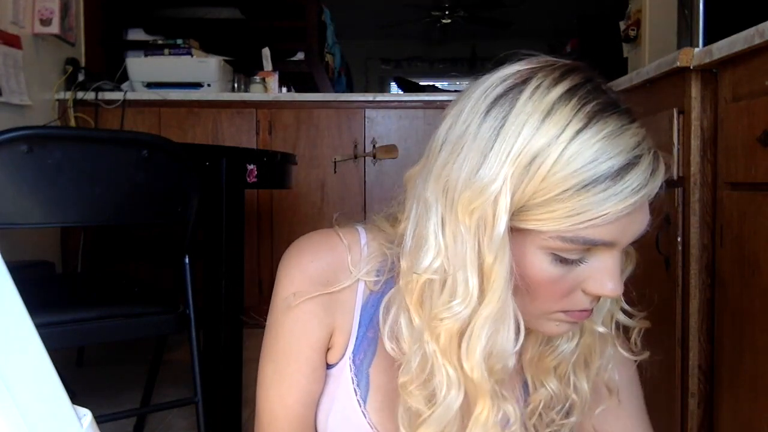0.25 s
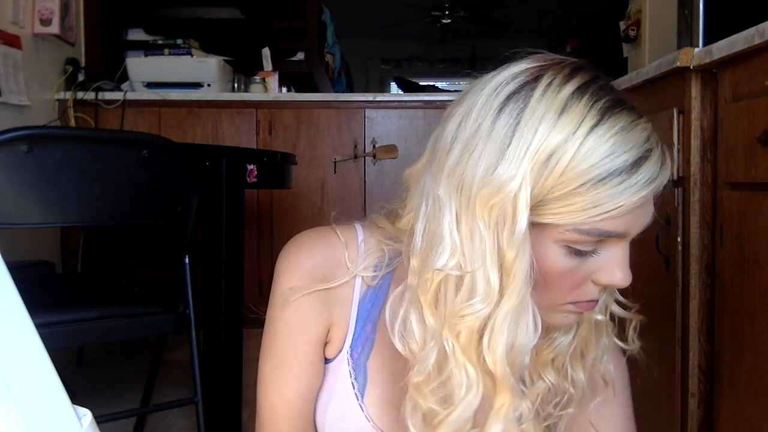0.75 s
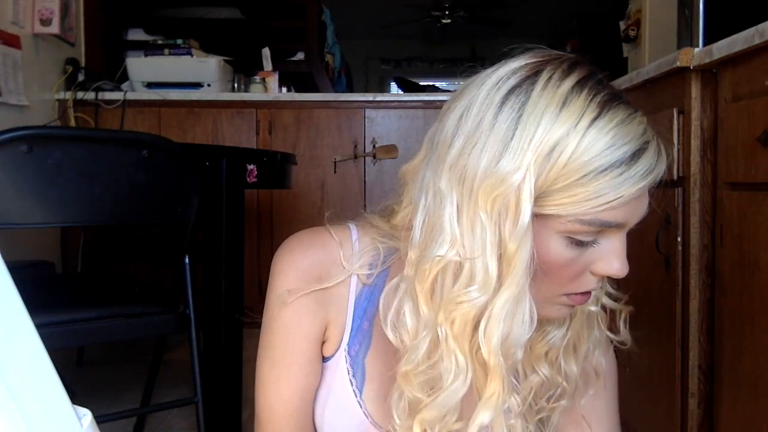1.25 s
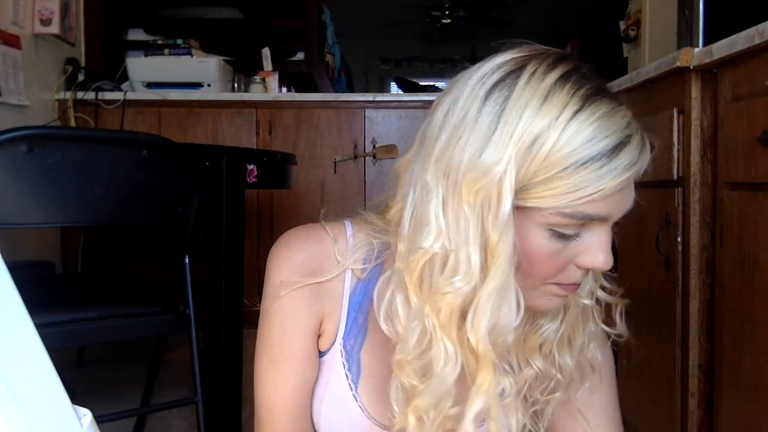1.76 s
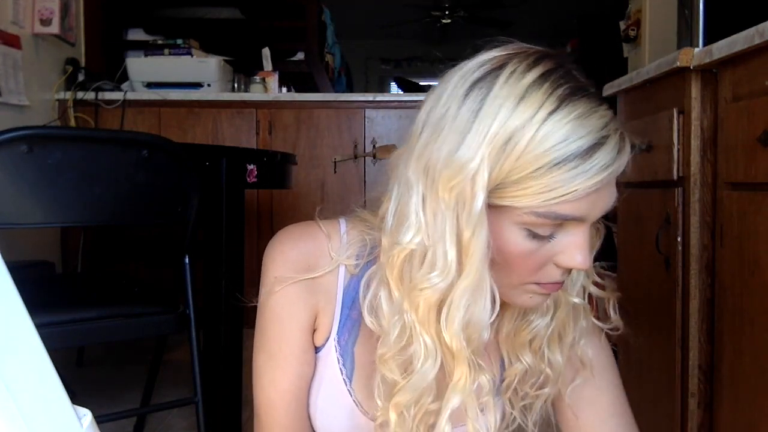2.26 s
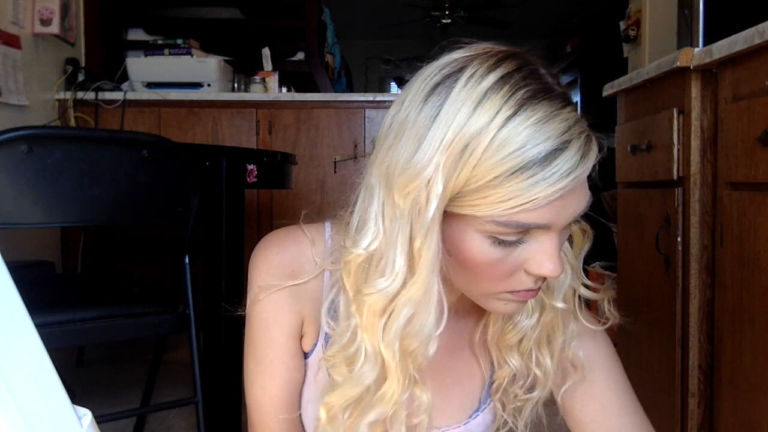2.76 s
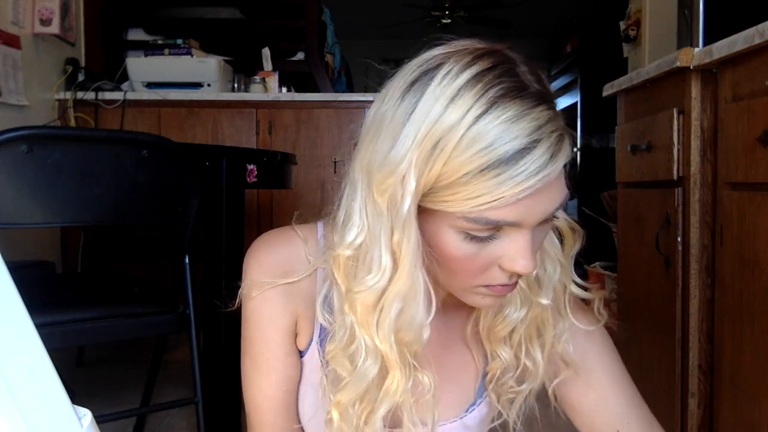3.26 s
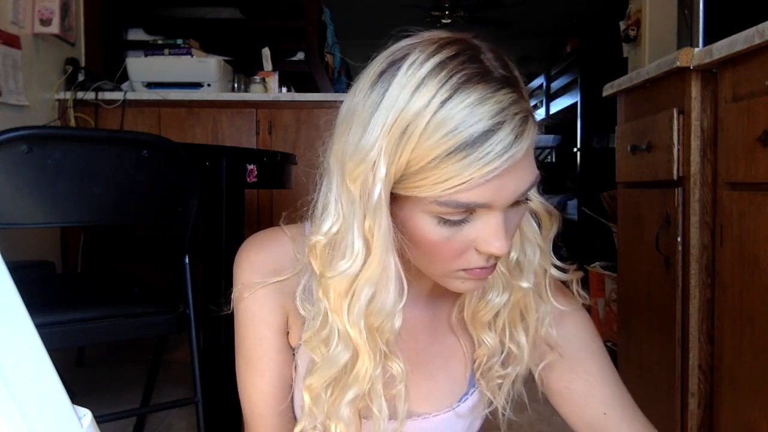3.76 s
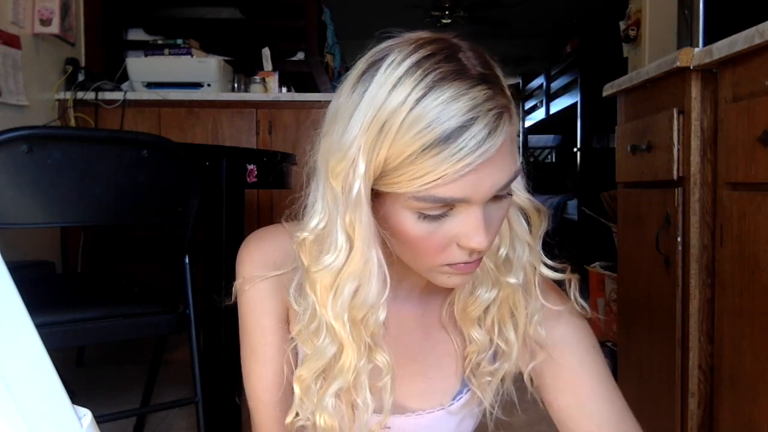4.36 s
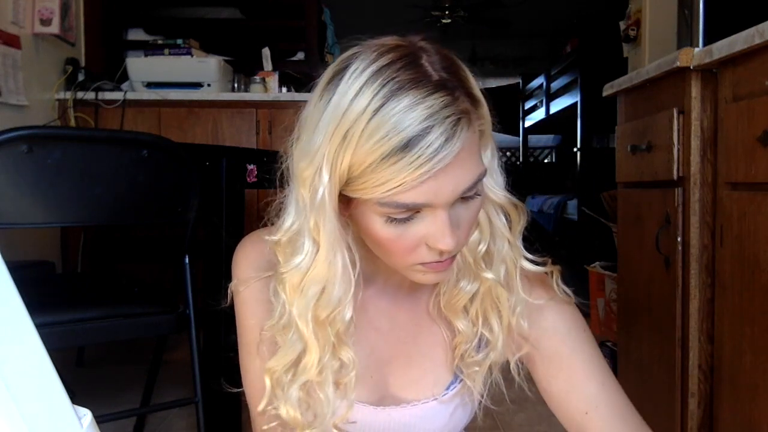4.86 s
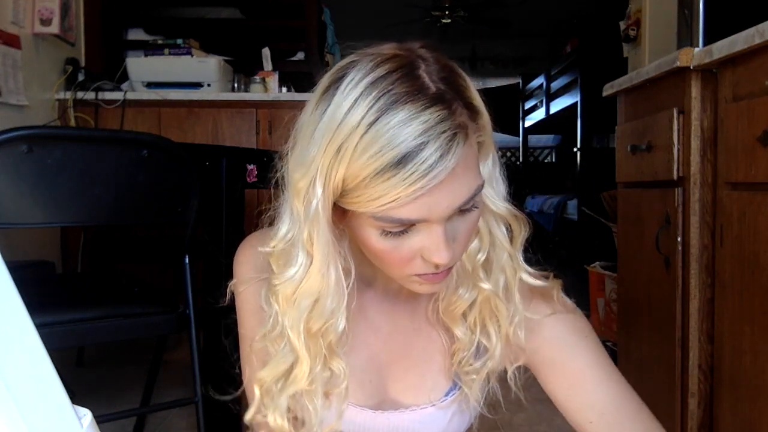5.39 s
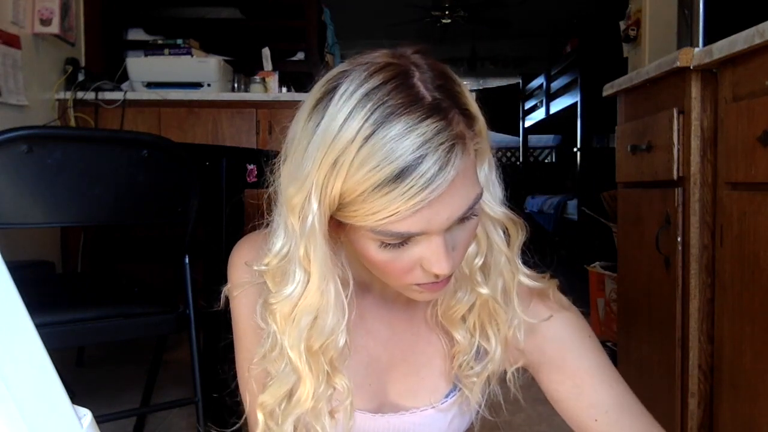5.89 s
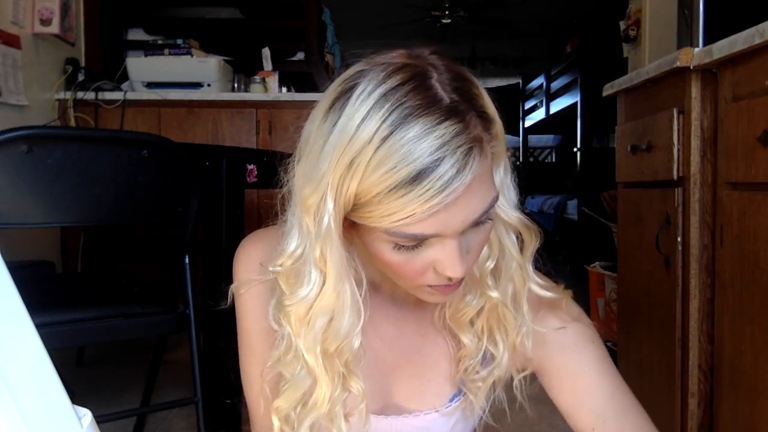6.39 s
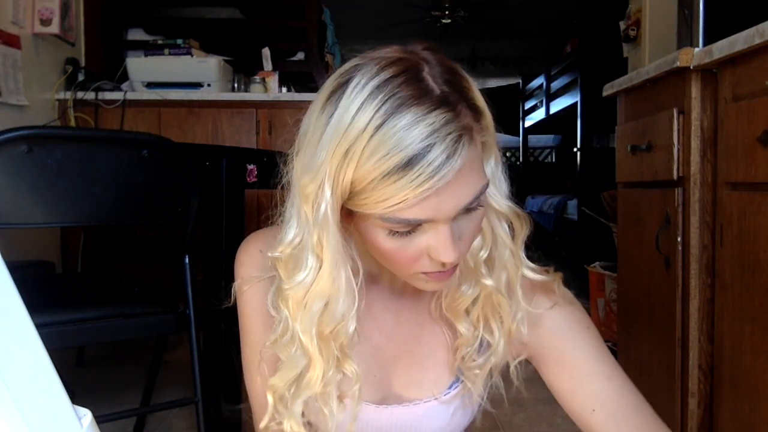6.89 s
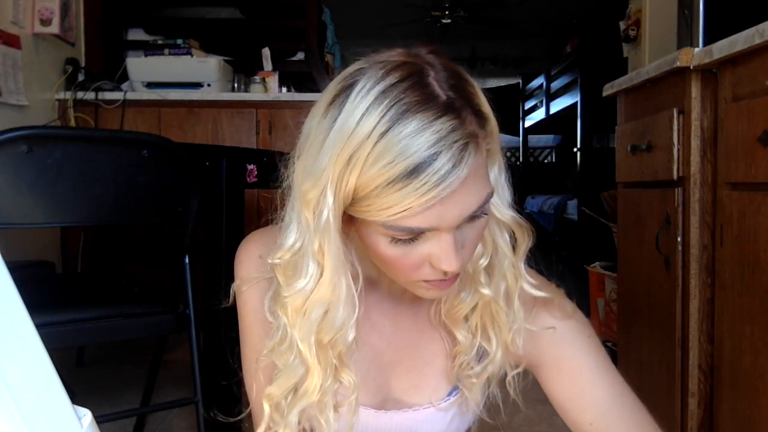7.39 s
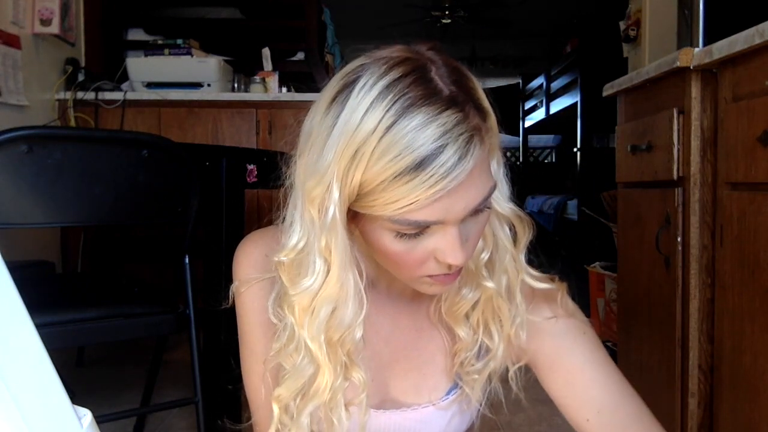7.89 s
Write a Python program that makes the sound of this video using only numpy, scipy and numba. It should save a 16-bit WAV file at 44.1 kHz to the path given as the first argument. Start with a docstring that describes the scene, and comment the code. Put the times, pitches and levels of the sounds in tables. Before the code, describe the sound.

Irregular rummaging among small cosmetics: dry knocks, bright cracks, short glassy rings, loose ticking and scraping, and occasional heavier items landing on a wooden-sounding drawer floor. It clatters thickly at first, calms after three seconds, resumes strongly, lulls again near seven, and finishes busy. The sound is near and slightly dull, with short small-room echoes over a low hiss and faint hum.

```python
"""Close by a laptop microphone in a small quiet room, a hand rummages for 8 s through makeup items in a drawer.
Clacks of plastic and glass come at once: uneven contacts that knock, crack and ring the item and the drawer.
From 0.4 s the drawer thuds now and then, heavy items land, loose ones tick and scrape, thin rings of glass
and metal sing near 0.5, 5.5, 6.5 and 7.9 s. It is calmer after 3.3 s and 6.8 s, and ends on a dense run
of clacks from 7.5 s. Hiss and hum lie beneath throughout, and a noise suppressor holds quiet moments down."""
import sys
import numpy as np
from scipy import signal
from scipy.fft import rfft, irfft
from scipy.io import wavfile
from scipy.ndimage import uniform_filter1d
from numba import njit

SR = 44100
rng = np.random.default_rng(int(sys.argv[2]) if len(sys.argv) > 2 else 0)


def to_wav(s):
    """Save 16-bit WAV."""
    ch = np.atleast_2d(s).T  # columns
    pcm = np.round(np.clip(ch, -1, 1) * 32767)  # PCM
    wavfile.write(sys.argv[1], SR, pcm.astype(np.int16))


N = 358974  # samples, 8.14 s

# room hiss, shape of its spectrum: pitch_hz, density_db (relative, per Hz)
HISS_SPECTRUM = [(30, -29), (60, -15.5), (110, -9.5), (200, -9), (420, -10), (700, -7.5), (900, -5),
                 (1250, -3.5), (1600, -11), (2500, -11.5), (4000, -18.5), (7500, -24.5), (10500, -40.5),
                 (16000, -80)]
# echo of the small room in bands: pitch_hz, t60_s, level_db (relative)
ECHO_BANDS = [(442, 0.18, 10.5), (1250, 0.24, 7.5), (4080, 0.24, 3), (6900, 0.18, 4.5), (12000, 0.11, -16)]
# thuds of the drawer on its runners: start_s, level_db (peak of the tone),
# pitch_hz (nominal; the tone starts above it and sags just below)
THUDS = [(0.388, -26, 166), (1.029, -32, 158), (1.463, -35, 117), (2.468, -37, 154), (3.023, -26.5, 114),
         (4.15, -30.5, 112), (4.612, -32, 151), (4.777, -32, 122), (5.09, -34, 112), (5.157, -25, 103),
         (5.618, -35, 159), (7.345, -33, 94), (8.03, -35.5, 162)]
# resonances of the drawer: pitch_hz, level_db (relative), t60_s
DRAWER_MODES = [(177, 1.5, 0.033), (327, -11, 0.0327), (500, -10, 0.026), (562, -12, 0.038),
                (665, 12, 0.08), (792.6, 19.5, 0.034), (951, 1.5, 0.045), (1148, 10, 0.081),
                (1370, 7.5, 0.018)]
# stirring of the loose items, one list of points for each handful: time_s, gain_db
STIR_HANDFULS = [
    [(0.42, -61), (0.622, -46), (0.846, -30), (1.178, -34), (1.38, -46)],
    [(2.27, -50), (2.312, -47), (2.432, -45), (2.886, -36.5), (2.92, -28)],
    [(3.17, -26), (3.224, -28), (3.38, -25)],
    [(4.58, -25), (4.79, -32.5), (5.318, -28.5), (5.49, -30), (5.68, -52)],
    [(6.06, -52), (6.264, -41), (6.486, -36), (6.616, -29), (6.78, -55)],
    [(7.5, -44), (7.92, -42), (8.034, -24), (8.14, -43)],
]
# thin rings of small glass and metal parts: start_s, level_db (peak), pitch_hz, rub_s
TINKS = [(.49, -33, 4880, 0.098), (0.501, -30, 6930, 0.087), (0.509, -33, 8800, 0.058),
         (5.494, -32, 14400, .03), (5.534, -42, 14500, 0.035), (6.536, -31, 14300, 0.04),
         (7.897, -38, 14200, 0.025)]
# heavy items landing on the drawer floor: start_s, level_db (peak), pitch_hz (of the panel)
LANDINGS = [(0.394, -14.5, 247), (1.072, -26, 440), (1.195, -12.5, 350), (4.598, -22, 463),
            (5.021, -18.5, 460), (5.606, -19, 457), (6.71, -13, 470)]
# resonances of an item: pitch_ratio, level_db (relative), ring_cycles (to fade 60 dB; below 0: shortest ring)
ITEM_MODES = [(1, 3, 31.5), (.62, -8.5, 13), (1.47, -4, 31.5), (2.1, -10.5, 22.5), (2.9, -11, -22.5)]
# clacks: start_s, level_db (nominal), pitch_hz (of the item), crack_db and drawer_db (both re level_db)
CLACKS = [(0.015, -18, 1050, -13, -31), (0.045, -20, 1300, -27, -22), (0.101, -22, 2400, -17, -29),
          (0.108, -7, 1710, -20, -17.5), (0.258, -20.5, 1930, -17, -16), (0.394, -7.5, 1810, -4, -11),
          (0.443, -10, 1240, -8, -31), (0.471, -16, 5560, -7, -36), (0.551, -14.5, 3870, -16, -46),
          (0.563, -9, 1810, 3, -28), (0.57, -2.5, 1320, -2.5, -20), (0.619, -1.5, 1677, -17, -17.5),
          (0.697, -11.5, 1470, -9, -39), (0.757, -17.5, 4610, -8, -17), (0.766, -6.5, 3130, -5.5, -42),
          (0.808, -7, 1040, 6.5, -25), (0.932, -22.5, 2540, -3, -22), (0.944, -16.5, 4160, -6, -33),
          (0.957, -6.5, 1430, -16.5, -27), (1.006, -12, 1210, -2, -22), (1.02, -5.5, 1240, -6.5, -38),
          (1.04, -8.5, 1060, -3.5, -24), (1.057, -4, 1690, -21, -10), (1.076, -7.5, 1040, -10, -28),
          (1.119, -8, 1840, -10, -38), (1.144, -11, 4140, -4.5, -39), (1.17, -26, 4230, -2, -15),
          (1.195, -1.5, 1780, -3, -9), (1.234, -11.5, 4300, -8, -24), (1.24, -4.5, 2500, -22, -11.5),
          (1.3, -20.5, 2510, -6, -7), (1.32, -10.5, 1450, -1, -32), (1.41, -6, 1660, -14.5, -42),
          (1.559, -7, 1554, -6.5, -36), (1.625, -13.5, 1740, 3.5, -7), (1.788, -6.5, 3720, -32, -16),
          (1.823, -11, 2630, -16, -37), (1.84, -11, 2960, -20, -34), (1.877, -12.5, 2850, -15, -11.5),
          (1.897, -9, 1980, -4.5, -27), (2.257, -16, 1710, -6, -4), (2.273, -5.5, 2780, -9, -11.5),
          (2.316, -7, 1220, -15, -12.5), (2.329, -15, 1650, -7, -29), (2.355, -15, 1630, -5, -25),
          (2.402, -17.5, 1870, -5.5, -12), (2.432, -17, 1260, -13, -26), (2.441, -10, 1270, -14, -29),
          (2.478, -2, 1236, -13.5, -23), (2.49, -2, 1450, 0, -11.5), (2.519, -8, 3820, -16, -15),
          (2.656, -7.5, 1740, -23, -28), (2.672, -3, 1333, -7.5, -33), (2.772, -11.5, 3070, -29, -32),
          (2.781, -7.5, 1840, -38, -13.5), (2.832, 3, 6830, -19, -19), (2.854, -3.5, 1200, -12, -43),
          (2.949, -12.5, 3770, -34, -20), (2.977, -15.5, 1690, -11, -22), (3, -14.5, 1180, -18, -26),
          (3.066, -22, 1900, -3, -16), (3.098, -15, 2620, -24, -13), (3.116, -12.5, 1600, -19, -34),
          (3.18, -10, 1170, -16, -35), (3.193, -11.5, 1110, -7, -18), (3.201, 0, 1150, -10.5, -39),
          (3.226, 0.5, 3250, -18, -12), (3.269, -6.5, 2950, 1.5, -15), (3.283, 0.5, 2560, -9, -16.5),
          (3.348, -8, 5830, -29, -31), (3.619, -22, 3170, -21, -30), (3.73, -18, 3430, -20, -9.5),
          (3.869, -22.5, 2010, -3, -23), (3.895, -17.5, 4270, -11, -36), (3.915, -20.5, 2380, 7.5, -36),
          (3.955, -19, 6300, -11, -30), (4.139, -21, 3840, -5, -28), (4.334, -18, 902, -15.5, -14),
          (4.383, -15, 946, -19, -16), (4.43, -22.5, 6200, -15, -25), (4.444, -18, 6110, -16, -24),
          (4.48, -10, 4360, -29, -22.5), (4.587, -13.5, 6600, -19, -31), (4.599, 4, 3020, -32, -15.5),
          (4.629, -2, 1280, -3.5, -11.5), (4.646, -6, 1380, 3, -11.5), (4.664, -7, 1170, 7.5, -12),
          (4.703, -3.5, 3000, -14, -14), (4.72, -5.5, 1430, -10, -22), (4.73, -3.5, 1197, -7, -17.5),
          (4.788, -14, 5220, -29, -25), (4.817, -20, 3050, -24, -30), (4.856, -17.5, 1540, 1, -29),
          (4.878, -3.5, 1210, 1.5, -10), (4.94, -11.5, 1780, -15, -20), (4.984, -5.5, 2480, -30, -34),
          (4.996, -3, 1360, -12.5, -18), (5.017, -9.5, 1360, -12, -21), (5.072, -8.5, 1810, -1.5, -33),
          (5.105, -8.5, 1730, -3.5, -43), (5.148, -10.5, 3350, -19, -10.5), (5.16, -10.5, 2840, -3.5, -26),
          (5.171, -7.5, 1730, -18, -7.5), (5.198, -5, 1680, -21, -19), (5.24, -9, 1180, -5, -20),
          (5.312, -7.5, 1130, -8, -28), (5.35, -11.5, 1070, -12, -25), (5.363, -17.5, 6130, -17, -17),
          (5.399, -6.5, 1370, -20, -11), (5.415, -3.5, 1610, -15, -13), (5.426, -0.5, 1130, -13, -11),
          (5.458, -1.5, 1190, -18, -13.5), (5.492, -10.5, 1350, -17, -6), (5.531, -6.5, 1270, -18, -35),
          (5.609, -5.5, 1174, -2, -20), (5.634, -6.5, 1730, -19, -12.5), (5.652, -14, 3230, -9, -12),
          (5.804, -25, 1240, 7.5, -26), (6.035, -12, 3270, -15, -15.5), (6.078, -7, 3300, -12, -26),
          (6.099, -8.5, 1050, 2.5, -37), (6.122, -7.5, 2180, -4, -9.5), (6.131, -12, 1460, -11, -28),
          (6.142, -13, 1480, 4.5, -22), (6.184, -11, 2520, -19, -11), (6.203, -8, 1680, -7.5, -12.5),
          (6.255, -9.5, 6350, -27, -38), (6.313, -17.5, 1420, -22, -17), (6.339, -20.5, 1380, 3.5, -23),
          (6.39, -15, 1400, -41, -6), (6.433, -8.5, 1390, -19, -30), (6.465, -7, 1330, 7, -43),
          (6.536, -13, 2800, -13, -41), (6.585, -10.5, 1760, -6.5, -33), (6.674, -9, 1670, 1, -11.5),
          (6.712, 3, 1240, -8, -14), (7.181, -20.5, 4120, -8.5, -29), (7.194, -17.5, 6760, -19, -18),
          (7.215, -18, 5800, -29.5, -8), (7.371, -18.5, 2140, -11.5, -22), (7.417, -28.5, 1150, 0.5, -17),
          (7.459, -21.5, 1240, -12, -8.5), (7.494, -4, 3030, -31, -46), (7.542, -15.5, 2630, -11, -31),
          (7.593, -7.5, 2820, -22, -33), (7.629, -16, 2700, -7.5, -20), (7.716, -18, 3500, -3.5, -15),
          (7.739, -17.5, 1750, -4, -26), (7.758, -9, 3440, -20, -30), (7.783, -4.5, 1220, -23, -15),
          (7.799, -4, 1120, -16, -11.5), (7.847, -17.5, 5200, -13, -22), (7.876, -22, 6740, -11, -21),
          (7.894, -12, 1190, -16, -21), (7.938, -5.5, 4100, -25, -16), (7.959, 4.5, 3270, -35, -17.5),
          (7.977, 1.5, 2680, -27, -30), (7.992, -0.5, 920, -15.5, -28), (8.019, -5.5, 2820, -15, -15),
          (8.04, -3.5, 3330, -23, -19), (8.054, -1.5, 1180, -21, -22)]

AIR_DB, HUM_DB, HUM_HZ = -39.5, -53.5, 134.5
PLACES = 4  # spots in the drawer, each with its own echo pattern
ECHO_DB, ECHO_GAP_S = -8, 0.00037
THUD_T60_S = 0.097
# a hard blow chatters longer and rings less clearly than a gentle one
BURST_MS, BURST_MS_PER_DB = 3.93, 0.0818
RING_DB, RING_DB_PER_DB = -7.5, -0.1335
LEAD_S, RISE_S = .0006, .0015  # each clack begins this early; time constant of the contact force
REBOUND_LOSS_DB, REBOUND_SCATTER_DB = -10.0, 2.5
# contacts poor in crack knock less, and stir the item's upper modes slightly more
KNOCK_DB, KNOCK_DB_PER_CRACK_DB, UPPER_DB_PER_CRACK_DB = 2, .5, -0.05
DRAWER_SCATTER_DB, DRAWER_RING_S = 4.0, 0.0041
# tiny edges that sing in the crack; cycles to fade 60 dB
CRACK_LOW_HZ, CRACK_HIGH_HZ, CRACK_CYCLES = 4540, 14600, 11
MIC_LOW_HZ, MIC_HIGH_HZ, TOP_HZ, SELF_NOISE_DB = 83.3, 13800, 15900, -69


def undb(db):
    """Decibels to amplitude."""
    return 10 ** (np.asarray(db) / 20)


def level(x, db):
    """Scales x to an RMS level."""
    return x * undb(db) / np.sqrt(np.mean(x ** 2))


def peak(x, db):
    """Scales x to a peak level."""
    return x * undb(db) / np.max(np.abs(x))


def burst(x, db, seconds):
    """Scales a short sound to an energy set by db and by a nominal duration."""
    return x * undb(db) * np.sqrt(seconds * SR / np.sum(x ** 2)) / 2


def add(out, x, s):
    """Mixes x into out from time s."""
    i = max(int(s * SR), 0)
    out[i:i + len(x)] += x[:len(out) - i]


def ring(x, hz, t60):
    """One damped mode struck by x; it radiates nothing at rest."""
    radius = np.exp(-np.log(1000) / (max(t60, .0004) * SR))
    angle = 2 * np.pi * min(hz, .4 * SR) / SR
    return signal.lfilter([1, 0, -1], [1, -2 * radius * np.cos(angle), radius * radius], x)


def band(x, lo_hz, hi_hz):
    """Keeps the band between two frequencies."""
    sos = signal.butter(2, [lo_hz, min(hi_hz, .47 * SR)], "bandpass", fs=SR, output="sos")
    return signal.sosfilt(sos, x)


def walk(rate):
    """Random levels held 1 / rate s and slewed twice; spread near 1."""
    k = int(SR / rate)
    held = np.repeat(rng.standard_normal(N // k + 1), k)
    return 1.2 * uniform_filter1d(uniform_filter1d(held, k), k)[:N]


@njit
def follow(x, rise, fall):
    """Envelope that rises fast and falls slowly."""
    y, e = np.empty(len(x)), 0.
    for i in range(len(x)):
        e += (x[i] - e) * (rise if x[i] > e else fall)
        y[i] = e
    return y


def air():
    """Smooth room hiss with a slightly restless bass, and a wavering appliance hum."""
    hz, db = np.transpose(HISS_SPECTRUM)
    f = np.maximum(np.fft.rfftfreq(N, 1 / SR), 1)
    shaped = rfft(rng.standard_normal(N)) * undb(np.interp(np.log(f), np.log(hz), db))
    bass = irfft(shaped * (f < 300), N) * undb(2.5 * walk(7))
    hiss = irfft(shaped * (f >= 300), N) * undb(.8 * walk(9))
    hum_hz = HUM_HZ * (1 + 0.0083 * walk(4.8))
    hum = np.sin(2 * np.pi * np.cumsum(hum_hz) / SR) * undb(3.5 * walk(5))
    return level(bass + hiss, AIR_DB) + level(hum, HUM_DB)


def room(dry):
    """Diffuse echoes of a small furnished room, shorter in the treble; every place has its own echo pattern."""
    t = np.arange(16384) / SR
    noise = rng.standard_normal((PLACES, len(t)))
    tail = np.zeros((PLACES, len(t)))
    for hz, t60, db in ECHO_BANDS:
        # wider bands higher up carry more energy
        part = level(band(noise, hz / 1.272, hz * 1.394), 10 * np.log10(hz / 1000))
        tail += undb(db - 60 * t / t60) * part
    tail = tail * np.clip(t / ECHO_GAP_S - 1, 0, 1)
    tail = tail * undb(ECHO_DB) / np.sqrt(np.sum(tail ** 2, axis=1, keepdims=True))
    return signal.fftconvolve(dry, tail, axes=1)[:, :N].sum(axis=0)


def thuds(push_s=0.004, sag=0.38, scrape_s=0.033, scrape_db=-3.0):
    """Soft pushes ring a low mode of the drawer, sagging in pitch, and leave an uneven rumble as it slides."""
    out, t = np.zeros(N), np.arange(8192) / SR
    swell = (1 - np.exp(-t / push_s)) ** 2
    for s, db, hz in THUDS:
        sagging_hz = hz * (1 + sag * (np.exp(-t / push_s / 4) - .3))
        tone = np.sin(2 * np.pi * np.cumsum(sagging_hz) / SR) * undb(-60 * t / THUD_T60_S)
        rumble = band(rng.standard_normal(len(t)), hz / 3.3, hz * 1.8) * np.exp(-t / scrape_s)
        add(out, peak(swell * tone, db) + peak(swell * rumble, db + scrape_db), s)
    return out


def stir(grain_db=3.5, bright_db=-10.5, low_hz=1300, high_hz=9000, cycles=12.0, flicker_db=4.0):
    """Small ticks of loose items, each kind ringing briefly on its own pitch and through the drawer's modes."""
    t = np.arange(N) / SR
    tick_db = grain_db * rng.exponential(size=N) + flicker_db * walk(60)
    ticks = (rng.random(N) < .02) * rng.standard_normal(N) * undb(tick_db)
    # the kind of item is drawn anew every 128 samples (3 ms)
    kind = np.repeat(rng.integers(0, 6, N // 128 + 1), 128)[:N]
    items = np.zeros(N)
    for k, hz in enumerate(np.geomspace(low_hz, high_hz, 6)):
        items += level(ring(ticks * (kind == k), hz, cycles / hz), bright_db * k / 5)
    body = sum(undb(db) * ring(ticks, hz, t60) for hz, db, t60 in DRAWER_MODES)
    sound = level(items, -7.5) + level(body, -15.5)
    gain = np.zeros(N)
    for handful in STIR_HANDFULS:
        time_s, gain_db = np.transpose(handful)
        gain += undb(np.interp(t, time_s, gain_db, left=-99, right=-99))
    return uniform_filter1d(gain, size=800) * sound


def tinks(t60=.03):
    """A brief rub keeps one high mode ringing unevenly."""
    out, t = np.zeros(N), np.arange(8192) / SR
    for s, db, hz, rub_s in TINKS:
        rub = rng.standard_normal(len(t)) * np.exp(-(t / rub_s) ** 2)
        add(out, peak(ring(rub, hz, t60), db), s)
    return out


def landings(t60=0.022, push_s=0.0037):
    """A heavier blow rings the floor panel and its neighbour mode."""
    out, t = np.zeros(N), np.arange(8192) / SR
    for s, db, hz in LANDINGS:
        blow = rng.standard_normal(len(t)) * np.exp(-t / push_s)
        add(out, peak(ring(blow, hz, t60) + 1.2 * ring(blow, 0.74 * hz, t60), db), s)
    return out


def bouncing(t, fade, luck, gap_s=0.01112):
    """Force of a blow and of its three rebounds, each later and typically weaker."""
    late = np.cumsum(np.r_[0, gap_s * np.exp(.5 * luck[:, 0])])
    size = undb(np.arange(4) * REBOUND_LOSS_DB + np.r_[0, REBOUND_SCATTER_DB * luck[:, 1]])
    since = np.maximum(t - late[:, None], 0)
    return size @ ((1 - np.exp(-since / RISE_S)) * np.exp(-since / fade))


def item_ring(contacts, hz, upper_db, fade, luck, scatter_db=1.0, spread=0.19):
    """The struck item's modes; no two items share a shape, so the upper modes shift from blow to blow."""
    out = np.zeros(len(contacts))
    for (ratio, db, cycles), (db_luck, pitch_luck) in zip(ITEM_MODES, luck):
        upper = ratio != 1
        mode_hz = hz * ratio * (1 + spread * pitch_luck * upper)
        mode = ring(contacts, mode_hz, cycles / (hz * ratio))
        out += burst(mode, db + upper * (scatter_db * db_luck + upper_db), fade)
    return out


def drawer_ring(contacts, luck):
    """The drawer's modes set off by the contacts, a little different for every blow."""
    out = np.zeros(len(contacts))
    for (hz, db, t60), (db_luck, pitch_luck) in zip(DRAWER_MODES, luck):
        out += undb(db + DRAWER_SCATTER_DB * db_luck) * ring(contacts, hz * (1 + 0.045 * pitch_luck), t60)
    return out


def edge_crack(contacts, t):
    """Early contacts set off four high, very short rings at pitches drawn anew each time."""
    sharp = contacts * np.exp(-t / 0.007)
    edges_hz = CRACK_LOW_HZ * (CRACK_HIGH_HZ / CRACK_LOW_HZ) ** ((np.arange(4) + rng.random(4)) / 4)
    return sum(level(ring(sharp, hz, CRACK_CYCLES / hz), 0) for hz in edges_hz)


def clacks(grit_db=2.0, late_s=0.001987):
    """Uneven contacts give a dull knock, a bright crack and short rings of item and drawer; one row per place."""
    out, t = np.zeros((PLACES, N)), np.arange(2816) / SR
    for k, (s, db, hz, crack_db, drawer_db) in enumerate(CLACKS):
        place, start = out[k % PLACES], s - LEAD_S
        fade = max(BURST_MS + BURST_MS_PER_DB * db, .3) / 1000
        grit = rng.standard_normal(len(t)) * undb(grit_db * rng.exponential(size=len(t)))
        contacts = grit * bouncing(t, fade, rng.standard_normal((3, 2)))
        # a gentle blow is duller: it knocks less and stirs little but the main mode
        gentle_db = 0.37 * min(db, 0)
        upper_db = gentle_db + UPPER_DB_PER_CRACK_DB * crack_db
        item = item_ring(contacts, hz, upper_db, fade, rng.standard_normal((len(ITEM_MODES), 2)))
        drawer = drawer_ring(contacts, rng.standard_normal((len(DRAWER_MODES), 2)))
        # small high-pitched items also knock higher
        middle_hz = np.sqrt(hz * 2200)
        knock = ring(contacts, middle_hz / 2.3, 1.57 / middle_hz)
        knock = ring(knock, middle_hz * 1.85, 0.71 / middle_hz)
        knock_db = db + gentle_db + KNOCK_DB + KNOCK_DB_PER_CRACK_DB * crack_db
        add(place, burst(knock, knock_db, fade), start)
        add(place, burst(item, db + RING_DB + RING_DB_PER_DB * db, fade), start)
        add(place, burst(edge_crack(contacts, t), db + crack_db, fade), start)
        add(place, burst(drawer, db + drawer_db, fade + DRAWER_RING_S), start + late_s)
    return out


def scene():
    """The items with their echoes, over the thuds and the room's air."""
    items = clacks()
    items[0] += stir() + landings() + tinks()
    return (items.sum(axis=0) + room(items) + thuds() + air())[None]


def record(dry, knee_db=-29.0, depth_db=9.0, soft_db=5.0, fall_s=0.014):
    """A suppressor lowers quiet moments; the microphone dulls and hisses, peaks clip, bass and top are cut."""
    loud = follow(np.abs(dry[0]), 1 / (0.00055 * SR), 1 / (fall_s * SR))
    opened = 1 / (1 + np.exp((knee_db - 20 * np.log10(loud + 1e-9)) / soft_db * 2))
    suppressed = dry * undb(depth_db * (opened - 1))
    x = signal.sosfilt(signal.butter(1, MIC_HIGH_HZ, fs=SR, output="sos"), suppressed)
    x = x + undb(SELF_NOISE_DB) * rng.standard_normal(N)
    x = np.clip(x, -.92, .92)
    x = signal.sosfilt(signal.butter(2, MIC_LOW_HZ, "highpass", fs=SR, output="sos"), x)
    return signal.sosfilt(signal.ellip(10, .2, 75, TOP_HZ, fs=SR, output="sos"), x)


dry = scene()
out = record(dry)
to_wav(out)
```